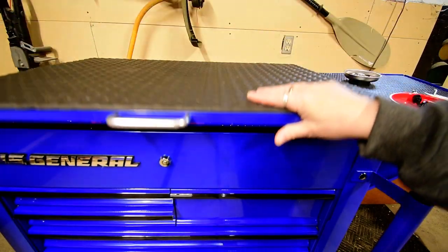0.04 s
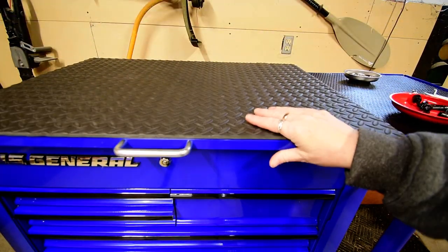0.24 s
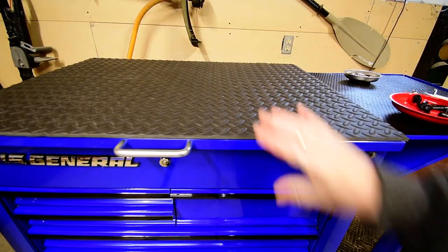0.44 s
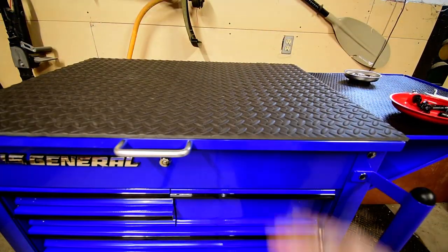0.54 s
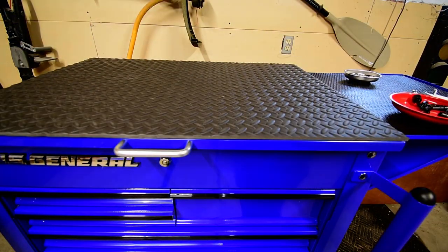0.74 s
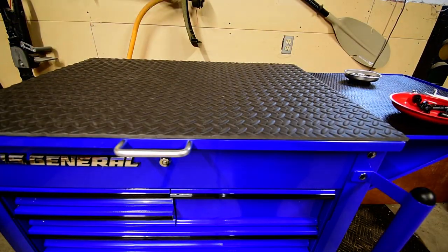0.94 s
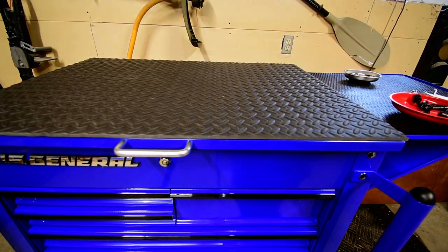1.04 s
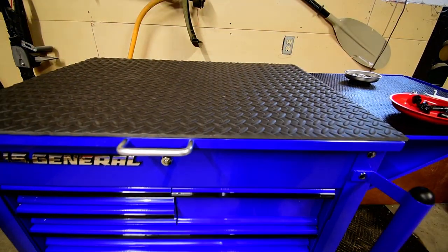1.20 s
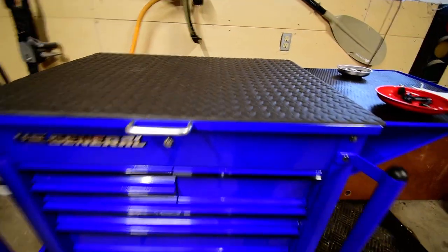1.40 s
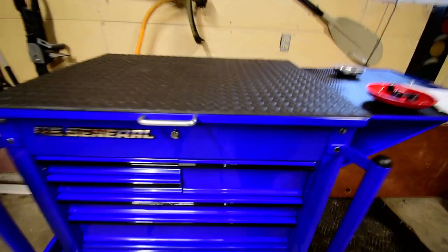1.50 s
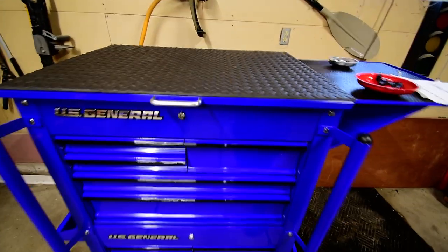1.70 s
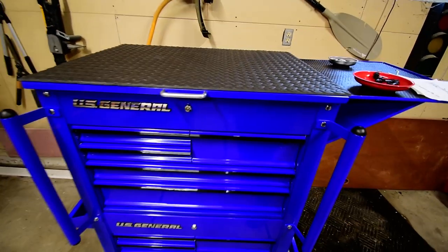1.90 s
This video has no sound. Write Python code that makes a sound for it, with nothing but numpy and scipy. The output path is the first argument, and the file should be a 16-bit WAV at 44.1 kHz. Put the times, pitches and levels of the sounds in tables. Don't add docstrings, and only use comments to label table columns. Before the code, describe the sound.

A heavy steel tool chest lid slams at 0.2 s, loud and clipped, bouncing at 0.3 and 0.4 s with ringing and panel rattle in a garage. Shoes scuff grit lightly from 0.5 s, with sharp ticks at 0.8 s. A small lock clicks at 1.04 s. Firmer scrapes follow until 1.4 s, then hand-held camera knocks, rubs and creaks, strongest around 1.5-1.75 s, fading with a faint low hollow ring.

```python
import sys
import numpy as np
from scipy import signal
from scipy.fft import rfft, irfft, next_fast_len
from scipy.io import wavfile
from scipy.ndimage import uniform_filter1d, minimum_filter1d, map_coordinates

SR = 44100
rng = np.random.default_rng(int(sys.argv[2]) if len(sys.argv) > 2 else 0)


def wav_record(signal):
    frames = np.transpose(np.atleast_2d(signal))
    bounded = np.clip(frames, -1, 1)
    quanta = np.round(bounded * 32767).astype(np.int16)
    wavfile.write(sys.argv[1], SR, quanta)


def boost_factor(decibels):
    exponent = np.asarray(decibels, float) / 20
    return 10 ** exponent


N = 85995

# (frequency [Hz], correlation [-1..1])
LIKENESS = [(30, .8), (70, .93), (170, .995), (350, .93), (700, .7), (1400, .42), (2500, .04),
            (12000, -.05)]
FLAT = [(20, 0), (20000, 0)]
HALVES = np.array([[0.5], [-0.5]])


def unit(x):
    return x / np.sqrt(np.mean(x ** 2) + 1e-20)


def along(points, hz):
    f, v = np.transpose(points)
    return np.interp(np.log(hz + 1), np.log(f + 1), v)


def filtered(x, response):
    m = next_fast_len(x.shape[-1] + 8192)
    hz = np.fft.rfftfreq(m, 1 / SR)
    return irfft(rfft(x, m) * response(hz), m)[..., :x.shape[-1]]


def port_angle(hz):
    return np.arccos(np.clip(along(LIKENESS, hz), -1, 1))


def stereo_noise(size, spectrum, tilt_db=0):
    # (frequency [Hz], difference [dB])
    port_tilt = [(30, 3), (150, -2.5), (5000, 1), (9000, -3), (13000, 0.5)]

    def mid_side(hz):
        gain = boost_factor(along(spectrum, hz) + tilt_db * np.log2((hz + 50) / 4000))
        half_angle = port_angle(hz) / 2
        return gain * [np.cos(half_angle), np.sin(half_angle)]

    mid, side = filtered(rng.standard_normal((2, size)), mid_side)
    both = np.array([mid + side, mid - side])
    return unit(filtered(both, lambda hz: boost_factor(along(port_tilt, hz) * HALVES)))


def dying(x, t60s):
    hz, t, z = signal.stft(x, SR, nperseg=256)
    t60_s = np.maximum(along(t60s, hz), 0.02)[:, None]
    return signal.istft(z * boost_factor(-60 * t / t60_s), SR, nperseg=256)[1][:, :x.shape[-1]]


def add(out, s, x, wet_db, feed=None):
    # (frequency [Hz], t60 [s])
    room_t60 = [(150, 0.99), (600, 0.47), (2500, 0.66), (8000, 0.38), (14000, 0.34)]
    tail = dying(stereo_noise(SR * 3 // 5, FLAT), room_t60)
    tail = np.pad(tail / np.linalg.norm(tail[0]), ((0, 0), (200, 0)))
    source = x.mean(0) if feed is None else feed
    wet = boost_factor(wet_db) * signal.fftconvolve(source[None], tail, axes=1)
    wet[:, :x.shape[1]] += x
    part = out[:, round(s * SR):]
    part[:, :wet.shape[1]] += wet[:, :part.shape[1]]


def air():
    # (frequency [Hz], density [dB per Hz])
    spectrum = [(25, -43), (79, -9.5), (240, -13), (500, -16.5), (1600, -24), (9000, -27), (11000, -33.5),
                (15500, -36)]
    return boost_factor(-53) * stereo_noise(N, spectrum)


def shell(f):
    # (frequency [Hz], width [Hz], level [dB])
    modes = [(72.6, 124, 2), (133.5, 48, 7), (255, 38, 3), (460, 48, -0.5), (680, 197, 0.5),
             (840, 360, -10)]
    response = 0
    for k, (centre, width, db) in enumerate(modes):
        resonance = 1j * f * width / (centre * centre - f * f + 1j * f * width)
        response = response + (-1) ** k * boost_factor(db) * resonance
    return response


def hollow_ring():
    start_s, hz, db, t60_s = 1.75, 257, -39, 0.9
    age = np.maximum(np.arange(N) / SR - start_s, 0)
    return boost_factor(db - 60 * age / t60_s) * np.sin(2 * np.pi * hz * age)


def grip_rub():
    # (time [s], level [dB])
    rubbing = [
        (1.19, -51.5),
        (1.42, -40),
        (1.496, -37),
        (1.586, -61.5),
        (1.748, -44),
        (1.95, -61),
    ]
    s, db = np.transpose(rubbing)
    now = np.arange(N) / SR
    lumps = map_coordinates(rng.standard_normal(120), [now * 50])
    level_db = np.interp(now, s, db, left=-90) + 17 + 0.88 * lumps
    return filtered(boost_factor(level_db) * stereo_noise(N, FLAT), shell)


def creaks():
    # (time [s], level [dB], tilt [dB per octave], length [s])
    slips = [(0.177, -53, -3.5, 0.016), (1.483, -24, -5, 0.0059), (1.487, -27, -2.5, 0.007),
             (1.502, -28.5, 0.5, 0.0048), (1.511, -32, 3.5, 0.0076), (1.635, -42, 0, 0.0016),
             (1.643, -26.5, 1, 0.0064), (1.647, -28.5, -1, 0.0071), (1.655, -31.5, -1, 0.0067),
             (1.671, -29, 2, 0.0042), (1.679, -38, 0.5, 0.014), (1.701, -31, 4, 0.012),
             (1.709, -30.5, 7.5, .011), (1.715, -29, -4.5, 0.0081), (1.724, -35, 7, 0.0074),
             (1.734, -29.5, 1.5, 0.0044), (1.739, -36, 0.5, 0.014), (1.809, -42, 0.5, 0.0052),
             (1.822, -44.5, 0, 0.0092), (1.91, -53, 12, 0.0061)]
    # (frequency [Hz], density [dB per Hz])
    colour = [(600, -14), (1000, -7.5), (2000, -2.5), (3700, -4.5), (4650, -1), (5800, -5.5), (10500, -18),
              (15500, -36)]
    rise_s, stop_s, wet_db = 0.001, 0.0028, -7
    out, t = np.zeros((2, N)), np.arange(SR // 10) / SR
    for s, db, tilt_db, length in slips:
        shape = (1 - np.exp(-t / rise_s)) * np.exp(-np.maximum(t - length, 0) / stop_s)
        add(out, s, boost_factor(db + 1.5) * shape * stereo_noise(len(t), colour, tilt_db), wet_db)
    return out


def thuds():
    # (time [s], level [dB], pitch [Hz], length [s])
    knocks = [(.154, -38, 694, 0.021), (.156, -39, 514, 0.015), (.172, -40.5, 620, 0.028),
              (.185, -43, 770, 0.011), (.188, -40, 465, 0.041), (0.808, -35.5, 702, 0.024),
              (.822, -36, 576, 0.025), (0.818, -36, 242, 0.063), (1.2, -37, 269.4, 0.023),
              (1.199, -40.5, 99, 0.034), (1.264, -28, 110, .024), (1.295, -33, 90, .04),
              (1.34, -34, 70, .05), (1.262, -29, 270, .026), (1.264, -31, 720, .03),
              (1.275, -32, 500, .022), (1.287, -30, 270, .02), (1.298, -22, 690, .026),
              (1.302, -29, 450, .03), (1.324, -30, 740, .024), (1.33, -31, 265, .025),
              (1.33, -31, 480, .022), (1.365, -34, 700, .03), (1.392, -32, 145, .025),
              (1.415, -31.5, 276, .022), (1.419, -35, 130, 0.014), (1.43, -38.5, 773, 0.035),
              (1.464, -28, 702, 0.039), (1.482, -28, 90, 0.0047), (1.483, -28.5, 626, .012),
              (1.498, -15, 245, .018), (1.527, -30, 500, .01), (1.561, -22, 265, .022),
              (1.561, -28, 650, .012), (1.635, -23, 250, .012), (1.637, -25, 650, .012),
              (1.648, -11.5, 178, .012), (1.65, -18, 417, 0.0072), (1.655, -30, 304, 0.024),
              (1.67, -22, 135, 0.031), (1.667, -28, 657, 0.022), (1.681, -23, 247, 0.016),
              (1.699, -18, 216, 0.021), (1.711, -32, 243, 0.024), (1.713, -24, 689, 0.023),
              (1.721, -24.5, 410, 0.013), (1.734, -28.5, 270, 0.013), (1.745, -37.5, 657, 0.021),
              (1.808, -32.5, 150, 0.024), (1.811, -36, 600, 0.011), (1.825, -38, 460, 0.028),
              (1.861, -44, 756, 0.047), (1.924, -38, 680, 0.033)]
    rasp_db, tone_db, rasp_octaves, skew = -2, -6, 1.1, 0.72
    tone, push = np.zeros((2, N + SR)), np.zeros((2, N + SR))
    t = np.arange(SR // 10) / SR
    for s, db, hz, length in knocks:
        at = slice(round(s * SR), round(s * SR) + len(t))
        shape = np.sin(np.pi * np.minimum(t / max(length, 0.004), 1) ** skew)
        colour = [(hz / 4 ** rasp_octaves, -24), (hz, 0), (hz * 8 ** rasp_octaves, -18)]
        push[:, at] += boost_factor(db + rasp_db) * shape ** 2 * stereo_noise(len(t), colour)
        tone[:, at] += boost_factor(db + tone_db) * shape * np.sin(2 * np.pi * hz * t)
    return tone[:, :N] + filtered(push[:, :N], shell)


def lock():
    # (time [s], peak [dB])
    clicks = [
        (1.0427, -12),
        (1.0441, -18),
    ]
    band_hz, low_db, wet_db = (3900, 10000), -16, 0
    out, click = np.zeros((2, N)), 1.0 * (np.arange(300) == 0)
    band = signal.butter(4, band_hz, "band", fs=SR, output="sos")
    for s, db in clicks:
        snap = signal.sosfilt(band, click) + boost_factor(low_db) * np.diff(click, prepend=0)
        add(out, s, boost_factor(db) * snap / np.abs(snap).max() * boost_factor([[-1], [1]]), wet_db)
    return out


def ticks():
    # (time [s], peak [dB], pitch [Hz], t60 [s])
    snaps = [(0.8061, -19, 4800, 0.0074), (0.808, -15, 9000, .008), (0.8125, -12, 9100, 0.0069),
             (0.8163, -25, 9000, .005), (0.8213, -13, 8500, 0.01), (1.0172, -32.5, 5500, 0.017),
             (1.0436, -11.5, 6400, 0.0066), (1.0477, -24, 9000, .006), (1.06, -23, 9100, 0.0046),
             (1.096, -23, 4450, .008), (1.1021, -18.5, 4300, 0.011), (1.1055, -18, 6200, 0.0056),
             (1.1072, -30, 6000, 0.0091), (1.116, -23, 4440, .008), (1.1205, -35, 5440, 0.0095),
             (1.276, -22.5, 6500, 0.033), (1.5135, -39, 7500, 0.0042), (1.5285, -41, 10000, 0.0047)]
    # (frequency [Hz], gain [dB])
    mic_top = [(10000, 0), (11500, -2.5), (16000, -7)]
    low_hz, rise_s, skirt_db, wet_db = 3040, 0.000067, -18, -1.5
    out, t = np.zeros((2, N)), np.arange(SR // 40) / SR
    high = signal.butter(4, low_hz, "high", fs=SR, output="sos")
    impulse = 1.0 * (np.arange(len(t)) == 40)
    for s, db, hz, t60 in snaps:
        colour = [(hz / 2, skirt_db), (hz, 0), (hz * 2, skirt_db), (22000, -30)]
        shape = boost_factor(db - 2.5 - 60 * t / t60) * (1 - np.exp(-t / rise_s))
        noise = filtered(stereo_noise(len(t), colour), lambda f: boost_factor(along(mic_top, f)))
        snap = signal.sosfilt(high, shape * noise)
        blip = filtered(impulse, lambda f: boost_factor(0.5 * along(colour, f) + along(mic_top, f)))
        blip = signal.sosfilt(high, blip)
        add(out, s, snap, wet_db, blip * np.linalg.norm(snap[0]) / np.linalg.norm(blip))
    return out


def scuffs():
    # (time [s], level [dB], hold [s], tilt [dB per octave], pan [dB])
    drags = [
        (0.534, -41.5, 0.027, 3.5, -1),
        (0.599, -33, 0.01, 0.5, 0),
        (0.733, -48, 0.01, 4, -3),
        (0.801, -33, 0.051, 0, 0),
        (1.096, -33.5, 0.026, 0, 0.5),
        (1.19, -52, 0.06, -20, -19),
        (1.27, -31.5, 0.073, 1, -1),
        (1.329, -30.5, 0.029, 3, 0),
        (1.394, -43.5, 0.13, 0.5, 8),
        (1.898, -49, 0.038, -5.5, -6),
    ]
    # (frequency [Hz], density [dB per Hz])
    grit = [(150, -18), (600, -4), (1500, -2), (7000, -0.5), (9300, -5), (10500, -11.5), (14500, -23.5),
            (15600, -27)]
    rise_s, t60_s, grain_db, wet_db = 0.0035, 0.21, 2.5, -1
    out, t = np.zeros((2, N)), np.arange(SR // 4) / SR
    for s, db, hold, tilt_db, pan_db in drags:
        shape = (1 - np.exp(-t / rise_s)) * boost_factor(-60 * np.maximum(t - hold, 0) / t60_s)
        lumps = unit(uniform_filter1d(rng.standard_normal(len(t)), size=50))
        grains = unit(boost_factor(grain_db * lumps))
        level = boost_factor(db + pan_db * HALVES)
        add(out, s, level * shape * grains * stereo_noise(len(t), grit, tilt_db), wet_db)
    return out


def lid():
    # (time [s], clatter [dB], crack [dB], ring [dB], rim mode [dB])
    blows = [
        (0.2141, 4, 3.5, 5, -4),
        (.300, -7.5, -15, 3, -4.5),
        (.309, 2, -20, 5, 7),
        (.387, -11, -13, -2.5, -6),
        (.41, -28, -36, -4, -9),
    ]
    # (frequency [Hz], level [dB], t60 [s])
    modes = [(150, -0.5, 0.16), (169.55, 1.5, 0.34), (198.5, 1, 0.32), (302, -10, .34), (351, 2.5, 0.27),
             (489.8, -4.5, 0.304), (552.6, -9, 0.25), (634.5, -5, 0.318), (721, -4.5, 0.75),
             (798.5, -6, 0.32), (900, -7, 0.34), (1245, 7.5, 0.067), (1677, 8, 0.097), (1906, 10.5, 0.067)]
    # (frequency [Hz], density [dB per Hz])
    sheet = [(45, -30.5), (190, -19.5), (400, -17), (1500, -15.5), (4000, -11), (9000, -21), (11000, -35.5),
             (15500, -46)]
    # (frequency [Hz], t60 [s])
    sheet_t60 = [(200, 0.6), (1000, 0.48), (4000, 0.16), (10000, 0.21)]
    rim_low_hz, rim_high_hz, upper_t60_s = 330, 380, 0.26
    ring_all_db, ring_rise_s, waver_rad, ring_wet_db = -9, 0.038, 0.86, -19
    crack_t60_s, wet_db = 0.051, -8
    out, t = np.zeros((2, N)), np.arange(SR * 3 // 5) / SR
    for s, clatter_db, crack_db, ring_db, rim_db in blows:
        ring = 0
        for hz, level_db, t60 in modes:
            drift = waver_rad * map_coordinates(rng.standard_normal(30), [t * 40])
            phase = 2 * np.pi * hz * t + drift + port_angle(hz) * HALVES
            blow_db = rim_db if rim_low_hz < hz < rim_high_hz else ring_db
            t60_s = t60 if hz < rim_high_hz else min(t60, upper_t60_s)
            ring = ring + boost_factor(level_db + blow_db - 60 * t / t60_s) * np.sin(phase)
        add(out, s, boost_factor(ring_all_db) * ring * (1 - np.exp(-t / ring_rise_s)), ring_wet_db)
        crack = boost_factor(crack_db - 1 - 60 * t / crack_t60_s) * stereo_noise(len(t), sheet, 0.89)
        clatter = boost_factor(clatter_db - 5) * dying(stereo_noise(len(t), sheet), sheet_t60)
        add(out, s, clatter + crack, wet_db)
    return out


def scene():
    camera = hollow_ring() + grip_rub() + creaks() + thuds()
    return air() + camera + lock() + ticks() + scuffs() + lid()


def top_cut(x):
    return signal.sosfilt(signal.butter(12, 15610, fs=SR, output="sos"), x)


def record(dry):
    ceiling, hold_s, drive, knee = 0.98, 0.0036, 1.325, 51
    size = round(hold_s * SR)
    need = np.minimum(1, ceiling / (np.abs(dry).max(0) + 1e-9))
    x = drive * dry * uniform_filter1d(minimum_filter1d(need, size), size)
    mix = x / (1 + np.abs(x) ** knee) ** (1 / knee)
    return top_cut(mix)


dry = scene()
out = record(dry)
wav_record(out)
```